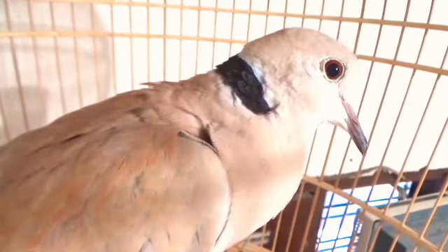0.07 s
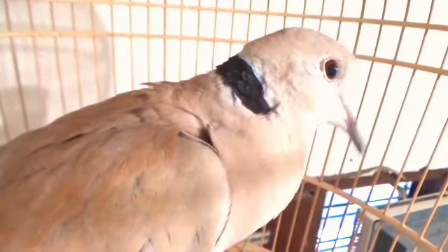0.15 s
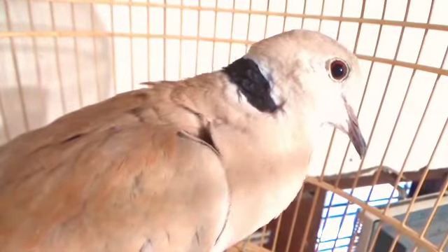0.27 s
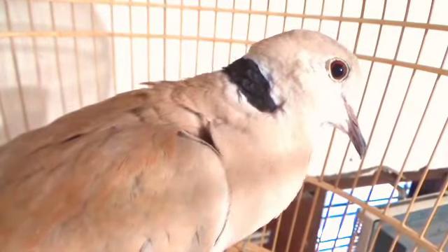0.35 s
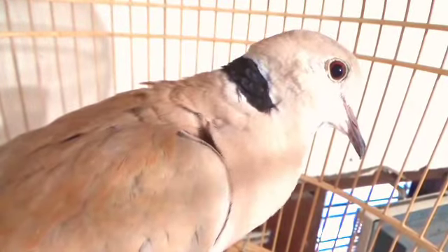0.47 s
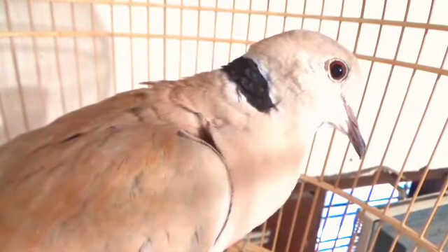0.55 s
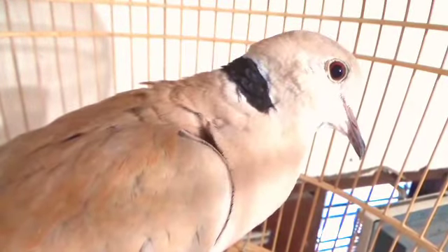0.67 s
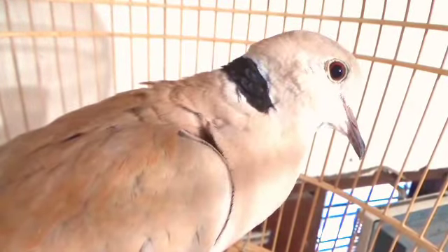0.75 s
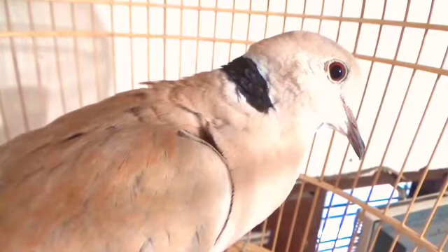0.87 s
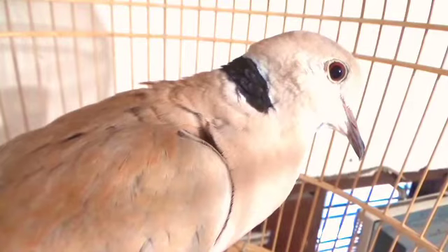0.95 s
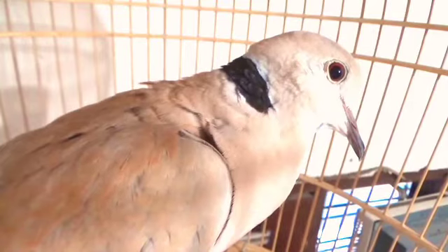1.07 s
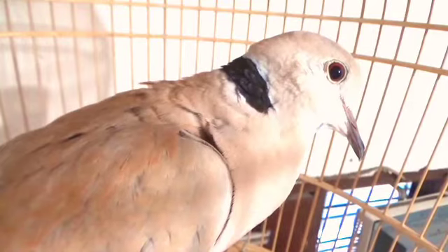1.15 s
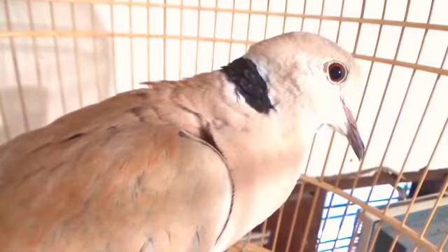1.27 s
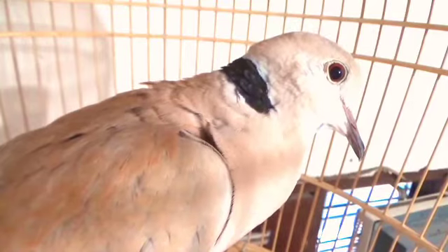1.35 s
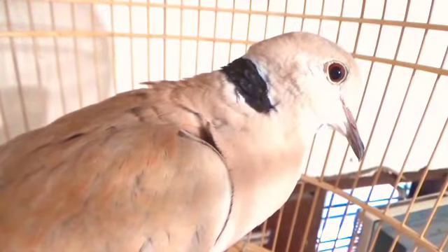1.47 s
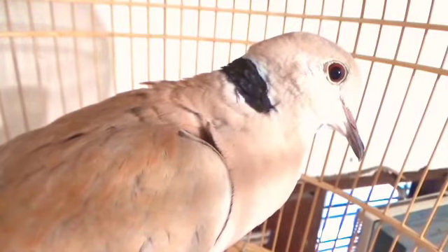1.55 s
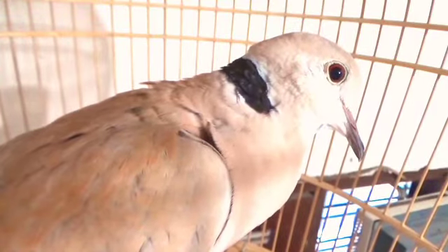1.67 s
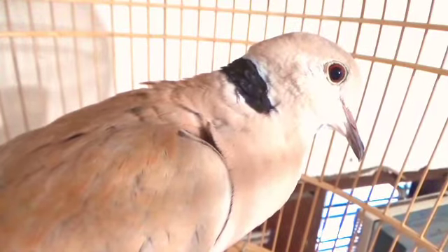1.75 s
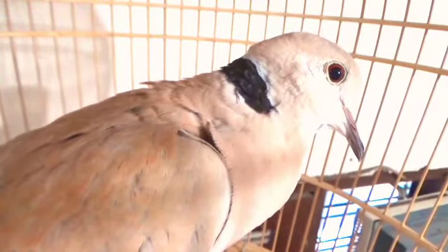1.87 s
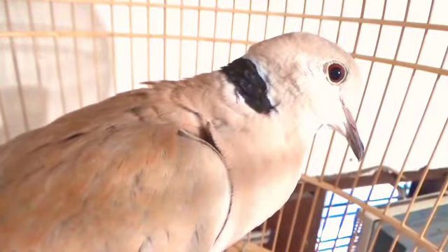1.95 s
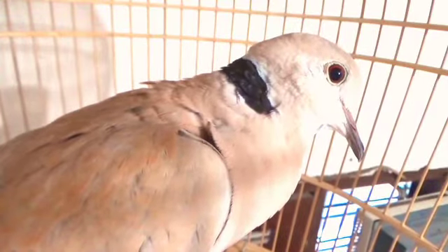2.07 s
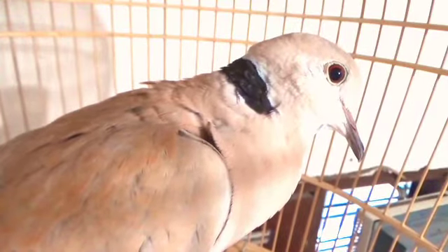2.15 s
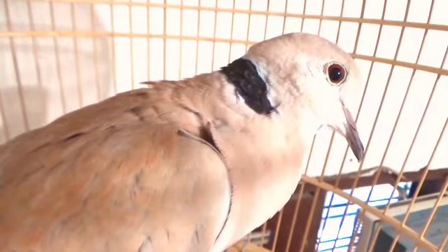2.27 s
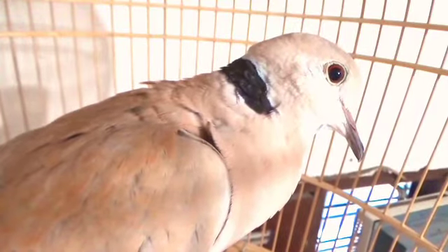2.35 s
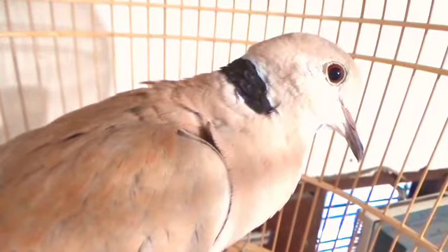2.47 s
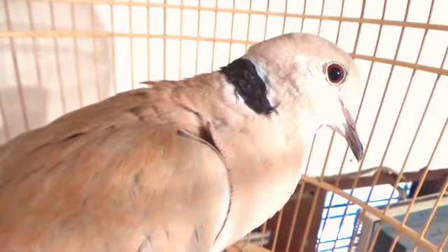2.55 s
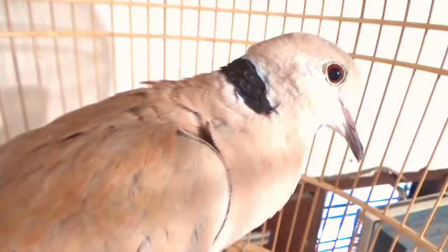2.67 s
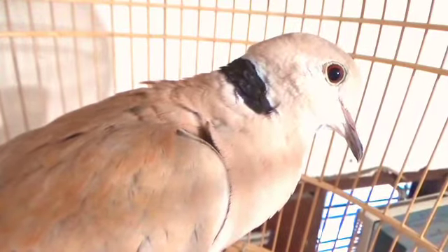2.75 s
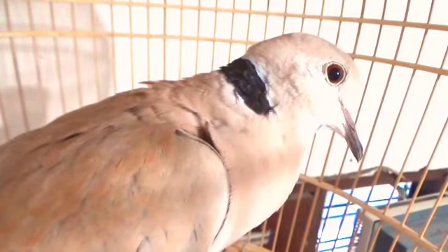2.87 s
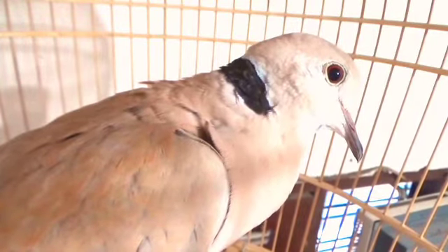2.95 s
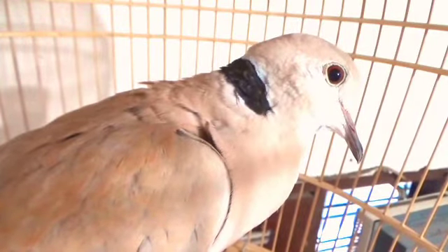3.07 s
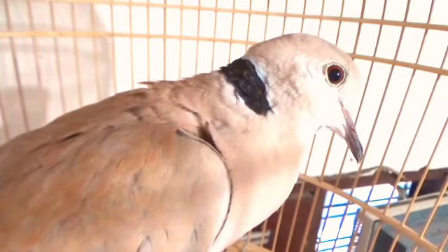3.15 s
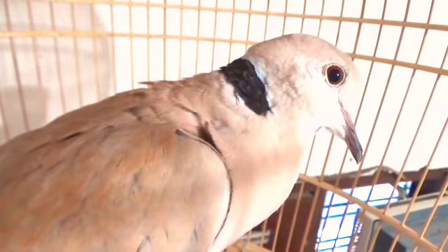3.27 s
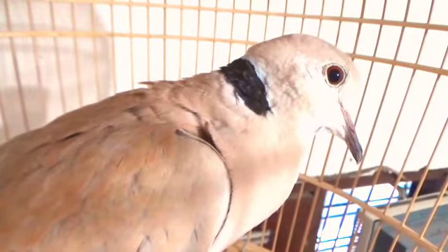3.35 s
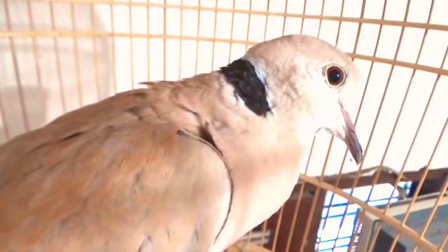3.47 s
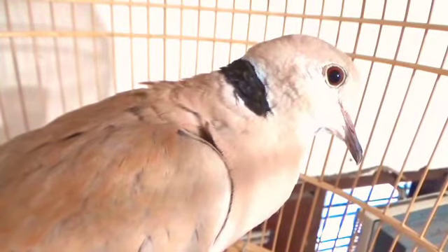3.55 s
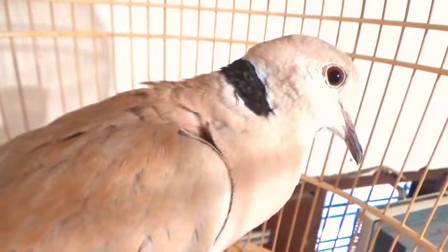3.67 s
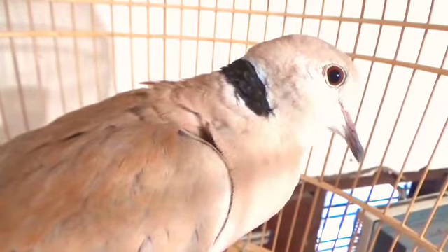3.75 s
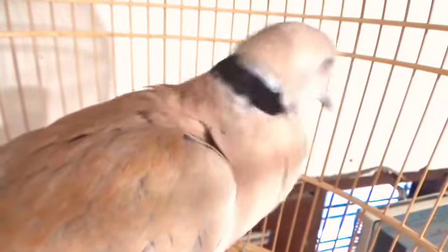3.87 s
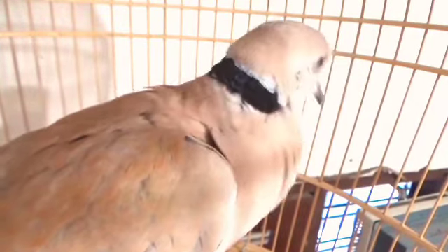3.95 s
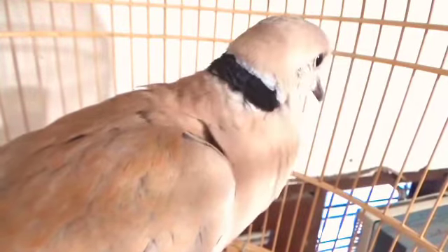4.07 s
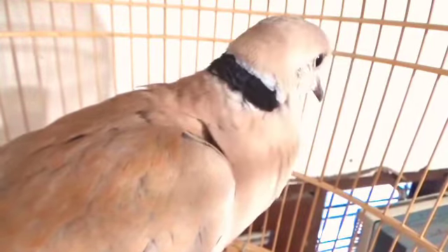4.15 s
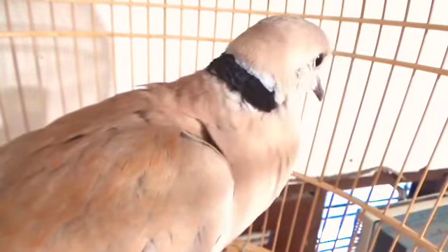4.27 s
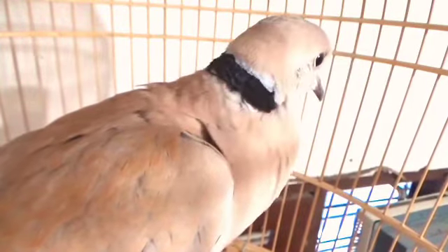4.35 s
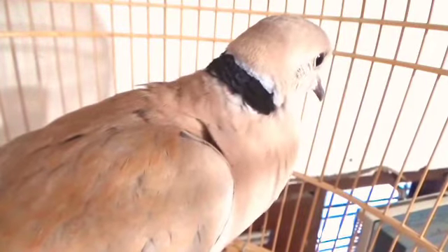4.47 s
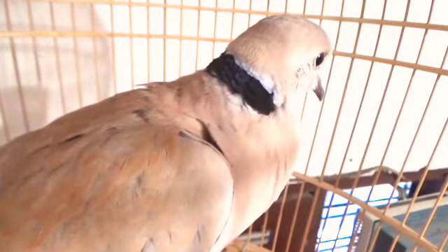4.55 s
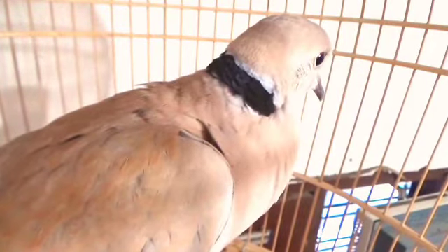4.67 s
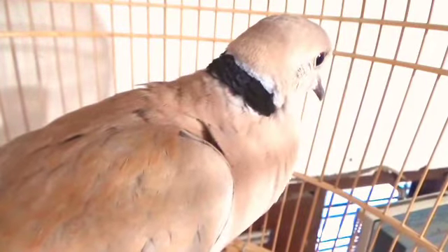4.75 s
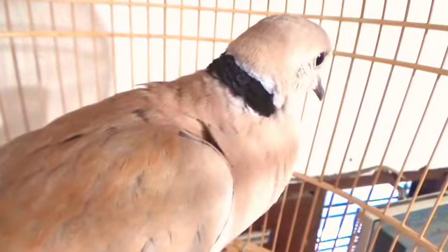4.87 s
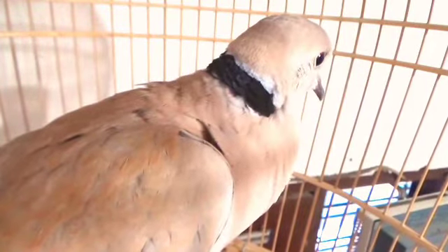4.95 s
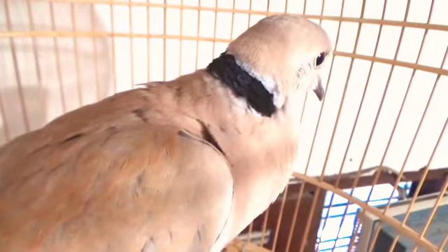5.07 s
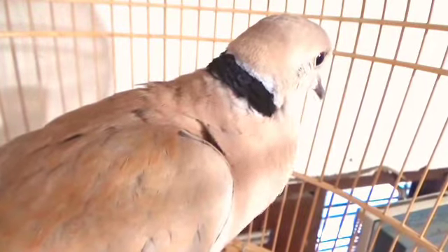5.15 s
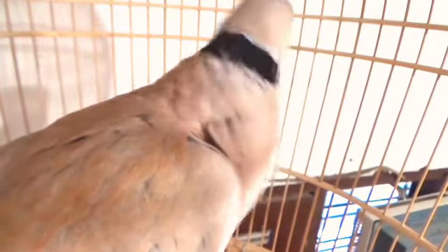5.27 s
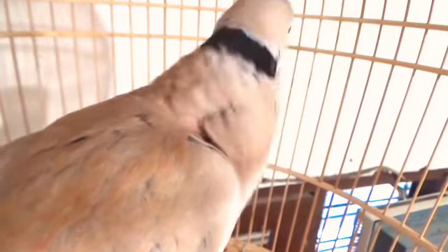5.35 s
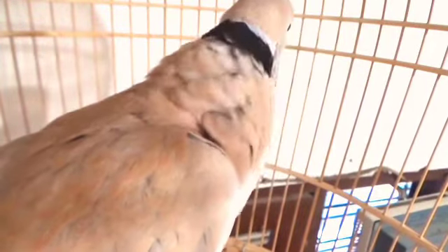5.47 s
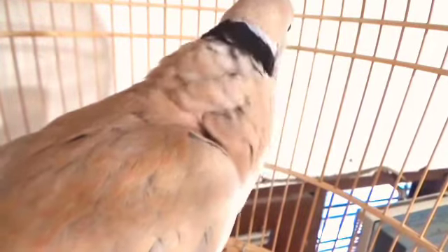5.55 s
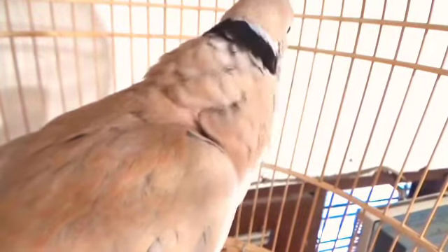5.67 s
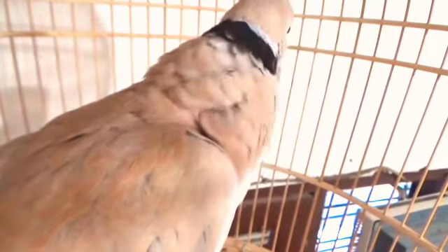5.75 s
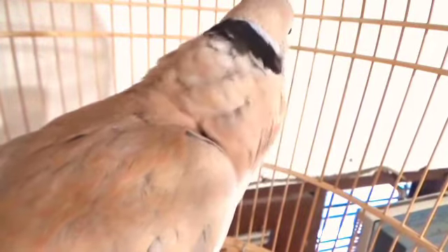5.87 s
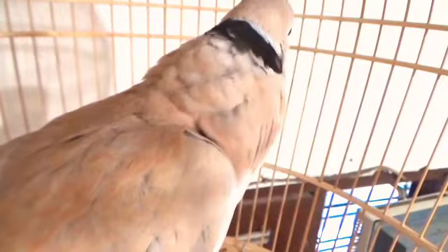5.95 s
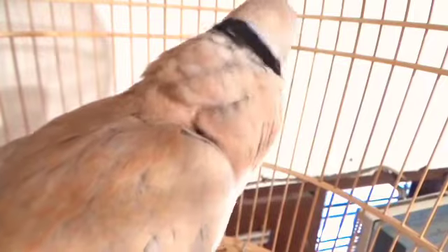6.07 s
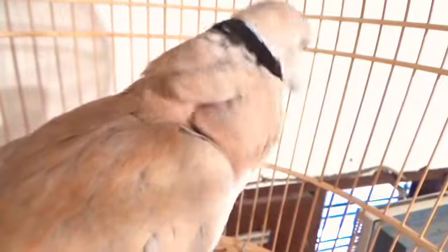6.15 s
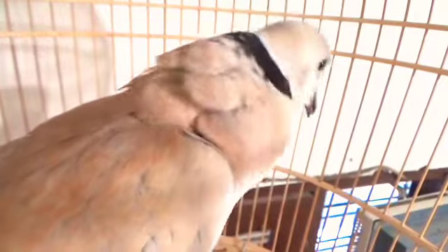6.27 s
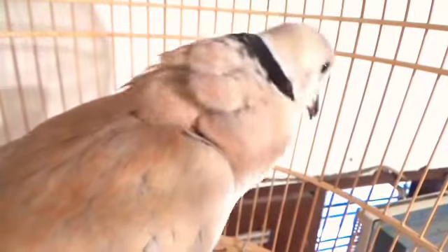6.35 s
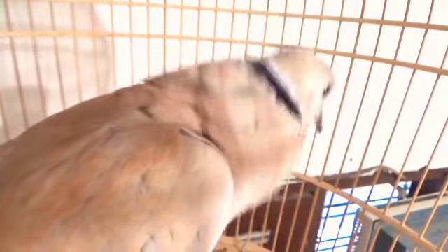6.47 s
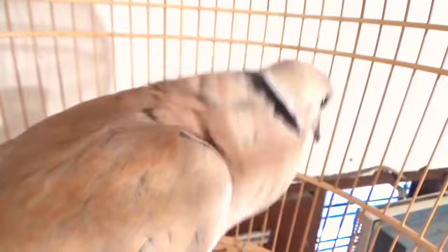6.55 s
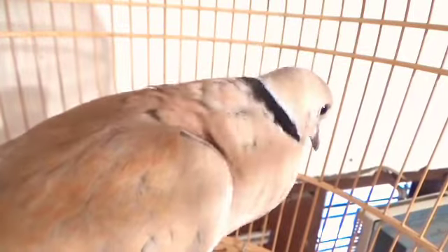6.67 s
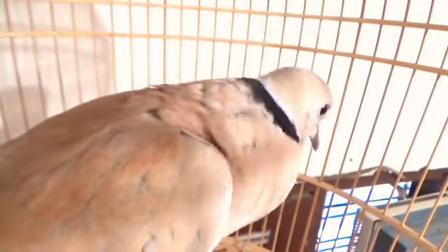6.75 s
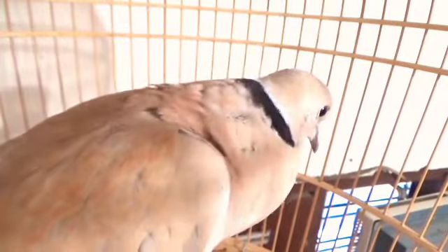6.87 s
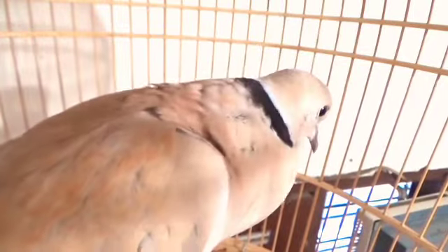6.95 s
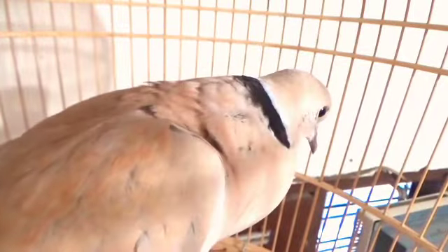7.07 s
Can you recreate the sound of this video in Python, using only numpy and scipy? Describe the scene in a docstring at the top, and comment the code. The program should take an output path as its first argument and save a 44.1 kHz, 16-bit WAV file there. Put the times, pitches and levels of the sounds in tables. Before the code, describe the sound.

A quiet bare room, heard in close stereo: soft, slightly flickering hiss over a low rumble and faint mains hum. From 0 to 2 s, distant small birds give brief falling chirps above a thin, high twitter that fades; a quick run of five notes comes around 1.2-1.5 s. Light dry ticks, irregular and slightly ringing, scatter from the start to about 5.7 s, a little clearer around 2.2 and 4 s. At 4.4 s a soft low hoot sounds far off; at 4.9 s a thin high whistle swoops down, followed by a tiny chirp. Near quiet follows. At 6.5 s the dove coos once, suddenly and very loudly: a husky upward slide breaks into a clear, hollow held note around 550-590 Hz, then drops, ending by 6.8 s. Faint feather brushes accompany it, and its hollow pitch rings through the room until the end, about 7.1 s, over ducked hiss.

```python
"""A bare room: a caged dove gives one loud coo close to the microphone, and the room rings on after it.
The coo is a gliding tone with throat-shaped overtones; modes and a diffuse wash make the ring.
Around it lie filtered-noise feather brushes, light ticks, a low rumble with hum, and hiss.
Far off, wavering tones chirp, whistle and hoot, and a band of noise twitters.
The coo drives the recorder's limiter, which ducks the background."""
import sys
import numpy as np
from scipy import signal
from scipy.fft import rfft, irfft
from scipy.io import wavfile
from scipy.ndimage import uniform_filter1d, minimum_filter1d

SR = 44100
rng = np.random.default_rng(int(sys.argv[2]) if len(sys.argv) > 2 else 0)


def generate_wav(sig):
    """Save sig (samples, or channels by samples) to the path in sys.argv[1] as 16-bit PCM at SR."""
    pcm = np.round(np.clip(np.atleast_2d(sig).T, -1, 1) * 32767).astype(np.int16)
    wavfile.write(sys.argv[1], SR, pcm)


N = 313551
T = np.arange(N) / SR

# the coo slides up in a low register, breaks into a high one, is held, and drops back
COO_START_S, SLIDE_S, HOLD_S, DROP_S, BREAK_S = 6.51, 0.062, 0.189, 0.046, 0.007


def dove(modes_db=2.0, modes_t60_s=1.33, low_wash_db=-23, high_wash_db=-13, room_lean_db=3):
    """The close coo beams to the right; room modes hold its fundamental, a wash mostly its overtones."""
    # the diffuse ring of the room: [hz, t60_s]
    room_decay = [(200, 0.8), (500, 7.1), (1200, 1.6), (1750, 1.16), (3000, 0.39), (6000, 0.16),
                  (12000, 0.16)]
    # right over left: the high register's fundamental leans right, the overtones slightly left
    beam_db, overtone_lean_db = 9.5, -2.5
    sides = np.array([[-0.5], [0.5]])
    tone, overtones = syrinx()
    direct_tone = tone * amp(sides * beam_db * high_register())
    direct_overtones = overtones * amp(sides * overtone_lean_db)
    ring = amp(modes_db + room_lean_db * sides) * standing_waves(tone, modes_t60_s)
    send_db = read([(650, low_wash_db), (1700, high_wash_db)], np.fft.rfftfreq(N, 1 / SR))
    sent = irfft(rfft(tone + overtones) * amp(send_db), N)
    return direct_tone + direct_overtones + ring + reverb(sent, room_decay, build_s=0.052)


def syrinx(jitter=0.0016, low_jitter=0.005, rasp_db=-38, attack_s=0.0048, release_s=0.023):
    """The voice: a jittering fundamental, and the overtones and rasp that crop and windpipe let out."""
    # what crop and windpipe let out of the overtones: [hz, level_db]
    throat = [(760, -10.5), (950, -38), (1160, -35.5), (1290, -47), (1450, -44), (1640, -29), (1750, -29),
              (1900, -40), (2120, -42), (2340, -46.5), (2900, -55.5), (3900, -77.5), (4650, -58),
              (5200, -60), (5750, -52.5), (6800, -87.5)]
    # loudness of the fundamental, before the dips at the breaks: [time_s, level_db]
    coo_level = [(6.512, -19), (6.532, -6), (6.558, -3.5), (6.652, -16.5), (6.708, -11.5), (6.724, -10),
                 (6.778, -4.5), (6.802, -12.5)]
    age_s, high = np.maximum(T - COO_START_S, 0), high_register()
    # the tone thins at each break
    break_dip_db = -2.5
    tone_db = np.interp(T, *np.transpose(coo_level)) + break_dip_db * np.sin(np.pi * high)

    # overtones swell quickly, hold, and fade towards the end of the held note
    overtone_db, swell_db, swell_s, fade_after_s, fade_db_per_s = -3.5, 9, 0.018, 0.19, 209.5
    drive_db = overtone_db - swell_db * np.exp(-age_s / swell_s)
    drive_db = drive_db - fade_db_per_s * np.maximum(age_s - fade_after_s, 0)
    # the low register is duller, but for one hard push
    low_dull_db, push_after_s, push_s, push_db = -5.5, 0.027, 0.0042, 8
    drive_db = drive_db + low_dull_db * (1 - high)
    drive_db = drive_db + push_db * np.exp(-((age_s - push_after_s) / push_s) ** 2)

    # pitch jitter is an rms fraction, larger in the low register
    wobble = evened(uniform_filter1d(rng.standard_normal(N), 300))
    hz = coo_pitch() * (1 + (low_jitter + (jitter - low_jitter) * high) * wobble)
    phase = 2 * np.pi * np.cumsum(hz) / SR
    left_s = SLIDE_S + HOLD_S + DROP_S - age_s
    gate = np.sin(np.pi / 2 * np.clip(np.minimum(age_s / attack_s, left_s / release_s), 0, 1)) ** 2
    overtones = sum(amp(read(throat, k * hz)) * np.sin(k * phase) for k in range(2, 12))
    # the low register is a little husky, the high one clear
    breath = noise(N, lambda f: read([(250, -50)] + throat, f) + 20 * np.log10(f + 1))
    rasp = amp(rasp_db) * np.interp(hz, [430, 560], [1, 0.1]) * breath
    return np.sqrt(2) * gate * np.array([amp(tone_db) * np.sin(phase), amp(drive_db) * (overtones + rasp)])


def coo_pitch():
    """A steady slide up, a held note that sags ever faster, and a drop that settles."""
    start_hz, slide_hz_per_s = 370, 2200
    top_hz, sag_hz, sag_power = 586, 45.4, 2.5
    drop_hz, end_hz, settle_s = 499.5, 414, 0.013
    age_s = np.maximum(T - COO_START_S, 0)
    held = np.clip((age_s - SLIDE_S) / HOLD_S, 0, 1)
    slide = start_hz + slide_hz_per_s * age_s
    drop = end_hz + (drop_hz - end_hz) * np.exp(-np.maximum(age_s - SLIDE_S - HOLD_S, 0) / settle_s)
    high = high_register()
    return high * (top_hz - sag_hz * held ** sag_power) + (1 - high) * np.where(held < 0.5, slide, drop)


def high_register():
    """1 while the coo is in its high register, 0 in the low one, with a quick break between."""
    since_s = T - COO_START_S - SLIDE_S
    return np.clip(0.5 + np.minimum(since_s, HOLD_S - since_s) / BREAK_S, 0, 1)


def standing_waves(x, t60_s):
    """Each low mode of the room stores the sound near its own pitch and rings on."""
    # the room's low standing waves: [hz, relative gain_db at resonance]
    room_modes = [(359, 12.5), (394, -7.5), (405, -12), (418, -4), (426, 1.5), (440, -10), (452, -2),
                  (464, -19.5), (474, -10.5), (483, -2), (497, -10), (514, 6.5), (537, -12), (545, 4.5),
                  (564, -0.5), (575, -23.5), (587, 6.5), (604, 5)]
    radius = np.exp(-np.log(1000) / t60_s / SR)
    ring = np.zeros(N)
    for hz, gain_db in room_modes:
        pole = radius * np.exp(2j * np.pi * hz / SR)
        ring += amp(gain_db) * signal.lfilter([2 * (1 - radius)], [1, -pole], x).real
    return ring


def feathers():
    """Feathers brush as the bird bows: short soft-edged bands of noise."""
    # each brush: [start_s, length_s, centre_hz, width_hz, level_db]
    rustles = [(6.586, 0.03, 8800, 1200, -47.5), (6.708, 0.018, 3850, 2000, -45),
               (6.723, 0.047, 3890, 2980, -48), (6.943, 0.036, 5440, 2000, -50.5),
               (7.064, 0.02, 7930, 490, -50)]
    out = np.zeros(N)
    for start_s, length_s, centre_hz, width_hz, level_db in rustles:
        brush = noise(int(length_s * SR), lambda hz: -20 * np.log10(1 + (2 * (hz - centre_hz) / width_hz) ** 2))
        add(out, start_s, amp(level_db) * brush * signal.windows.tukey(len(brush), 0.5))
    return out


def ticks(trim_db=-7.0, t60_s=0.095, ring_db=9.5, ring_width_hz=240, room_db=-3, room_t60_s=0.36, top_db=-20):
    """Short dry taps of decaying noise, each with its own colour and ring, washed by the room."""
    # the clearer ticks: [start_s, relative level_db, main ring_hz, thump_db, body_db]
    # thump and body are tone settings relative to the treble
    clear_ticks = [(0.5598, -31, 2900, 3, 1), (1.0846, -31.5, 2930, -5, -3), (1.3607, -29, 2930, -25, -18),
                   (1.5013, -32, 4350, -21, -3), (1.6387, -32, 4330, -7, -36),
                   (1.8347, -30.5, 3850, -4.5, -6), (1.911, -34.5, 2640, -17, 0),
                   (2.17, -31, 3580, -11, -12), (2.2368, -25, 1270, 2.5, 1), (2.29, -33, 2660, -18, -35),
                   (2.613, -32, 3000, -15, 1), (2.7156, -33, 3730, -19, -20), (2.9546, -29.5, 1560, -5, 8),
                   (3.041, -29.5, 2830, 8, -10), (3.3737, -29.5, 2930, -28, 1.5),
                   (3.7098, -35.5, 2420, -15, -19), (3.7885, -30.5, 1830, 10, -2),
                   (3.9995, -26.5, 1480, -3, 9), (4.0928, -28.5, 2430, -8, 3), (4.3256, -28.5, 2580, 1, 5),
                   (4.3745, -27.5, 2900, 1.5, 0), (4.6783, -31.5, 3450, -9, -12),
                   (4.9062, -28.5, 2800, -7, 5.5), (5.1602, -31.5, 3980, -9, -20),
                   (5.7114, -27.5, 1630, 3, 2.5)]
    # what all ticks ring with: [hz, width_hz, lift_db]
    tick_modes = [(690, 47, 19.5), (1570, 110, -2), (2683, 76, 13.5), (3140, 160, 5.5), (4160, 570, 5)]
    out, t = np.zeros(N), np.arange(8192) / SR
    for start_s, level_db, ring_hz, thump_db, body_db in clear_ticks + faint_ticks():
        # wider bands hold their power more thinly
        colour = [(250, thump_db - 7), (750, thump_db - 4.5), (1550, body_db - 2.5),
                  (3200, -6.5), (8000, top_db), (15000, -36)]
        modes = tick_modes + [(ring_hz, ring_width_hz, ring_db)]
        tap = noise(len(t), lambda hz: read(colour, hz) + bumps(modes, hz))
        decay = amp(level_db + trim_db - 60 * t / t60_s)
        add(out, start_s, tap * decay * (1 - np.exp(-t / 0.00075)))
    return out + amp(room_db) * reverb(out, [(500, room_t60_s), (8000, 0.137)], build_s=0.0042)


def faint_ticks(scatter_db=2):
    """Fainter, thinner ticks fall at random while the bird sits still; rows like the clearer ticks."""
    per_s, until_s, level_db, low_ring_hz, high_ring_hz, thin_db = 3.1, 4.8, -36.5, 2670, 4500, -24
    rows = []
    for when, force, ring in rng.random((round(per_s * until_s), 3)):
        tick_db = level_db + scatter_db * (2 * force - 1)
        ring_hz = low_ring_hz + (high_ring_hz - low_ring_hz) * ring
        rows.append((when * until_s, tick_db, ring_hz, thin_db, thin_db))
    return rows


def far_birds(room_db=-1.5, room_t60_s=0.31):
    """Short gliding whistles and a blurred twitter, heard largely through the room."""
    # far chirps, each note falling in pitch: [start_s, notes in the run, note length_s, start_hz, level_db]
    chirps = [(0.109, 1, 0.021, 1685, -48.5), (0.259, 1, 0.02, 1926, -42), (0.373, 1, 0.0057, 1500, -41.5),
              (0.715, 1, 0.031, 5070, -46), (0.797, 1, 0.023, 5500, -50), (0.931, 1, 0.018, 4900, -50),
              (1.005, 1, .032, 6480, -51), (1.21, 5, 0.019, 4920, -46.5), (5.055, 1, 0.027, 5150, -49)]
    note_gap_s = 0.071  # from one start to the next
    out = twitter()
    for start_s, count, length_s, start_hz, level_db in chirps:
        for k in range(round(count)):
            add(out, start_s + k * note_gap_s, note(falling(start_hz, length_s), level_db, waver=0.022))
    # one nearer whistle swoops down onto a held note
    at_s, whistle_s, whistle_hz, swoop_hz, swoop_s, whistle_db = 4.884, 0.054, 5860, 2420, 0.0047, -37.5
    swoop = whistle_hz + swoop_hz * np.exp(-np.arange(0, whistle_s, 1 / SR) / swoop_s)
    add(out, at_s, note(swoop, whistle_db, waver=0.018))
    return out + amp(room_db) * reverb(out, [(700, 0.28), (6000, room_t60_s)], build_s=0.0043)


def twitter(width_hz=560, release_s=0.09):
    """Many small far voices blurred into a narrow, flickering noise band that sinks and fades."""
    end_s, start_hz, sag_hz_per_s, start_db, fade_db_per_s = 1.97, 5880, 520, -52, 4
    blur = noise(N, lambda hz: -6 * (hz / width_hz) ** 2) * amp(flicker(depth_db=3.5, rate_hz=18))
    level = amp(start_db - fade_db_per_s * T) * np.clip((end_s - T) / release_s, 0, 1)
    carrier = np.sin(2 * np.pi * np.cumsum(start_hz - sag_hz_per_s * T) / SR)
    return level * blur * carrier


def far_hoot(room_db=1):
    """One soft, low, falling hoot from far away that lingers in the room."""
    at_s, length_s, start_hz, level_db, ring_t60_s = 4.383, 0.061, 739, -37.5, 1.3
    out = np.zeros(N)
    add(out, at_s, note(falling(start_hz, length_s), level_db, waver=0.035))
    return out + amp(room_db) * reverb(out, [(700, ring_t60_s)], build_s=0.0024)


def note(hz, level_db, waver):
    """A soft-edged whistle along a pitch curve; waver is its rms pitch wobble as a fraction."""
    wobble = evened(uniform_filter1d(rng.standard_normal(8192), 60))[:len(hz)]
    phase = 2 * np.pi * np.cumsum(hz * (1 + waver * wobble)) / SR
    return amp(level_db) * np.sqrt(2) * np.sin(phase) * signal.windows.tukey(len(hz), 0.5)


def falling(start_hz, length_s, fall=0.075):
    """The pitch curve of a note that falls by a fraction of its start pitch."""
    return start_hz * np.linspace(1, 1 - fall, int(length_s * SR))


def room_tone():
    """Low noise rumble with a mains hum in it, and a drifting hiss that flickers slightly."""
    # spectrum of the rumble: [hz, density_db]
    rumble_colour = [(12, -50.5), (20, -7.5), (27, -29.5), (59, -1), (102, -5.5), (151, -4), (235, -16),
                     (362, -15.5), (455, -22.5), (500, -21), (650, -38), (1100, -120)]
    # spectrum of the hiss: [hz, density_db]
    hiss_colour = [(240, -31), (400, -13), (550, -7), (670, -5), (860, -4.5), (1080, -10), (2100, -11),
                   (2950, -11.5), (4400, -13), (7200, -14), (9300, -13.5), (10800, -17.5), (12200, -22),
                   (15400, -23.5)]
    # the room's steady resonances in the hiss: [hz, width_hz, lift_db]
    air_modes = [(661, 41, 10.5), (785, 29, 6.7), (1560, 81, 6.3), (2920, 150, 3.8), (3880, 110, 4.9),
                 (4940, 150, 4.3), (8100, 170, 3), (9200, 300, 1.5)]
    # slow drift of the hiss: [time_s, relative level_db]
    drift = [(0, 1.9), (2.4, -0.1), (4.6, 0.96), (6.1, -0.6), (6.6, 0.5), (7.11, -3.3)]
    rumble_db, hum_hz, hum_db, hiss_db = -43.5, 101.4, -47, -48
    rumble = spread(*(noise(N, lambda hz: read(rumble_colour, hz)) for _ in range(2)))
    hiss = spread(*(noise(N, lambda hz: read(hiss_colour, hz) + bumps(air_modes, hz)) for _ in range(2)))
    hum = amp(hum_db) * np.sqrt(2) * np.sin(2 * np.pi * hum_hz * T)
    moving_db = hiss_db + np.interp(T, *np.transpose(drift)) + flicker(depth_db=0.8, rate_hz=26)
    return amp(rumble_db) * rumble + hum + amp(moving_db) * patchy(hiss, depth_db=2.5)


def flicker(depth_db, rate_hz):
    """A random level wobble in dB, slower than about rate_hz."""
    return depth_db * noise(N, lambda hz: -20 * np.log10(1 + (hz / rate_hz) ** 2))


def patchy(x, depth_db):
    """Lets a hiss swell in small patches, some 700 Hz wide and 35 ms long; the very top stays smooth."""
    hz, _, z = signal.stft(x, SR, nperseg=512)
    grain = uniform_filter1d(rng.standard_normal(z.shape[1:]), size=8, axis=0)
    patches = evened(uniform_filter1d(grain, size=6, axis=1))
    depth = read([(1200, depth_db / 2), (4000, depth_db), (9500, depth_db), (12000, 0.015)], hz)[:, None]
    return signal.istft(z * amp(depth * patches), SR, nperseg=512)[1][:, :N]


def reverb(x, t60s, build_s):
    """A diffuse noise tail that builds up, each band dying at its own speed."""
    hz, t, z = signal.stft(rng.standard_normal((2, SR)), SR, nperseg=256)
    z = z * amp(-60 * t / read(t60s, hz)[:, None]) * (1 - np.exp(-t / build_s))
    tail = spread(*signal.istft(z, SR, nperseg=256)[1])
    return signal.fftconvolve(x[None], tail / np.linalg.norm(tail[0]), axes=1)[:, :N]


def spread(mid, other):
    """Two close microphones in a diffuse field: the bass is shared, the middle range differs."""
    # how unlike the two channels are: [hz, side over mid_db]
    stereo_width = [(50, -36.5), (150, -21), (400, -4.5), (700, -5.5), (2000, -2.5), (5000, -6),
                    (9000, -7.5), (11000, -45.5)]
    side_db = read(stereo_width, np.fft.rfftfreq(len(other), 1 / SR))
    side = irfft(rfft(other) * amp(side_db), len(other))
    return np.array([mid + side, mid - side])


def noise(size, colour):
    """Noise of rms 1 whose spectrum in dB has the shape colour(hz)."""
    hz = np.fft.rfftfreq(size, 1 / SR)
    return evened(irfft(rfft(rng.standard_normal(size)) * amp(colour(hz)), size))


def bumps(modes, hz):
    """The dB lift of a few resonances."""
    return sum(lift_db / (1 + (2 * (hz - f) / width) ** 2) for f, width, lift_db in modes)


def read(points, hz):
    """Reads a table on a log-frequency axis."""
    f, value = np.transpose(points)
    return np.interp(np.log(hz + 1), np.log(f + 1), value)


def add(mix, start_s, sound):
    """Lays a sound into the mix at its start time."""
    part = mix[round(start_s * SR):][:len(sound)]
    part += sound[:len(part)]


def evened(x):
    """Scales to rms 1."""
    return x / np.sqrt(np.mean(x ** 2) + 1e-20)


def amp(db):
    """Decibels to gain."""
    return 10 ** (np.asarray(db) / 20)


def scene():
    """The dove near, the small birds far, over the quiet room."""
    return dove() + feathers() + ticks() + far_birds() + far_hoot() + room_tone()


def record(dry, recovery_db_per_s=8, edge_hz=15500):
    """A look-ahead limiter holds the peaks at full scale and recovers slowly; then a low-pass."""
    over_db = np.maximum(20 * np.log10(abs(dry).max(0) + 1e-9), 0)
    fall_db = T * recovery_db_per_s
    held_db = np.maximum.accumulate(over_db + fall_db) - fall_db
    # start turning down ahead of each peak, then smooth the gain
    gain_db = uniform_filter1d(minimum_filter1d(-held_db, size=300), size=300)
    low_pass = signal.firwin(511, edge_hz, window=("kaiser", 9), fs=SR)
    return signal.oaconvolve(dry * amp(gain_db), low_pass[None], "same")


dry = scene()
out = record(dry)
generate_wav(out)
```